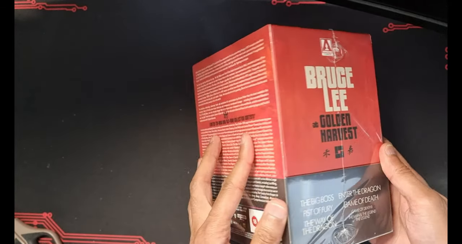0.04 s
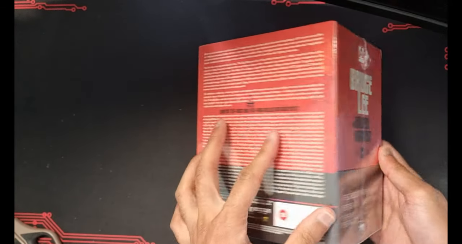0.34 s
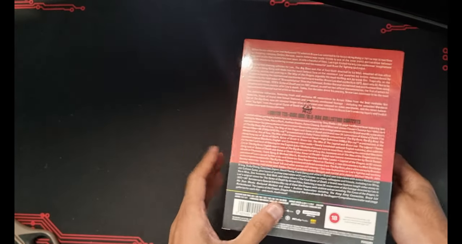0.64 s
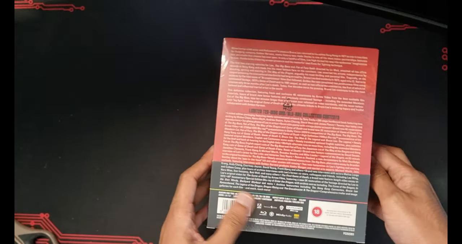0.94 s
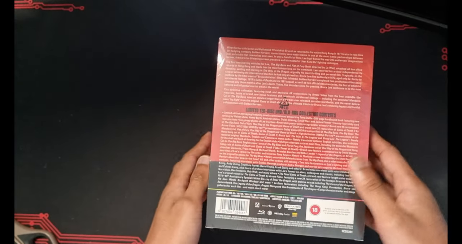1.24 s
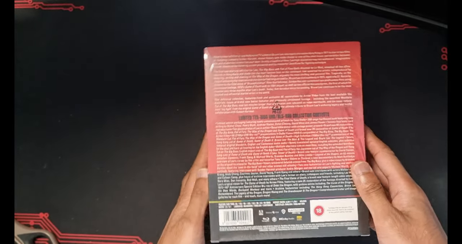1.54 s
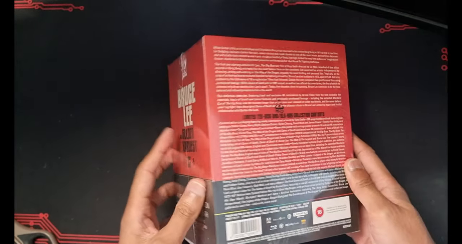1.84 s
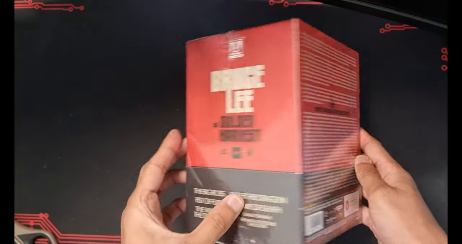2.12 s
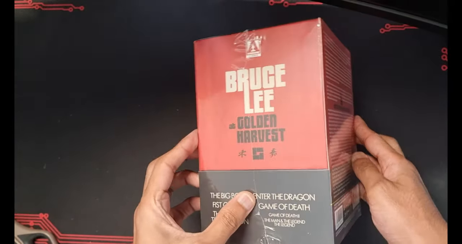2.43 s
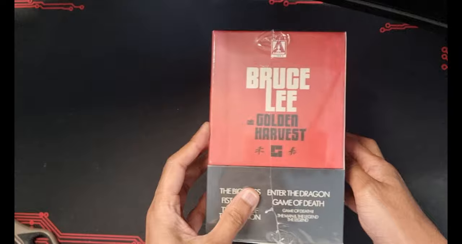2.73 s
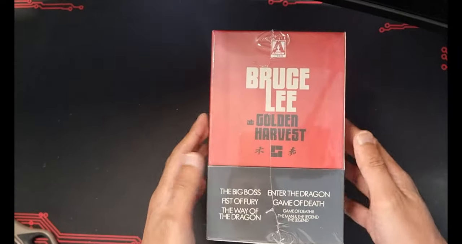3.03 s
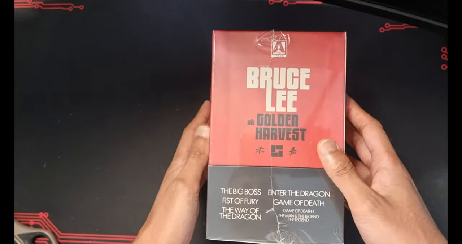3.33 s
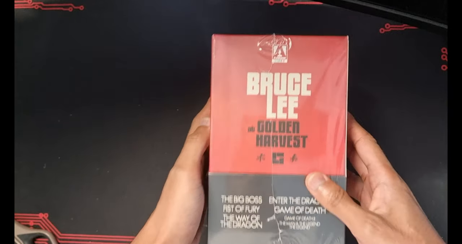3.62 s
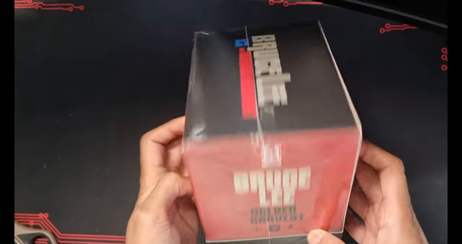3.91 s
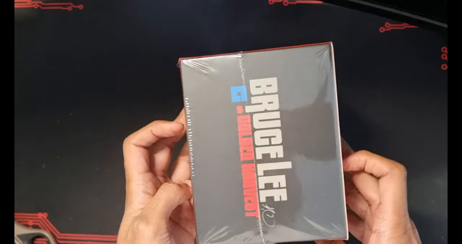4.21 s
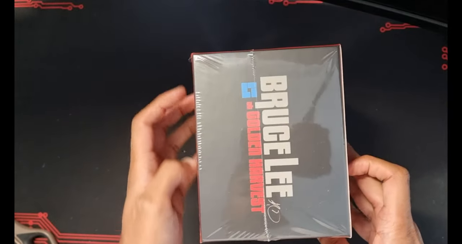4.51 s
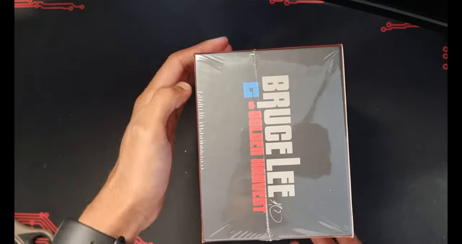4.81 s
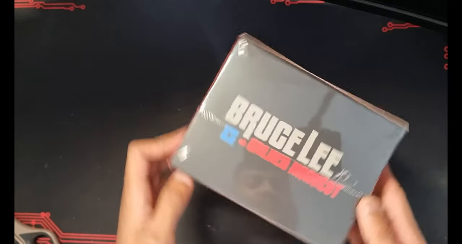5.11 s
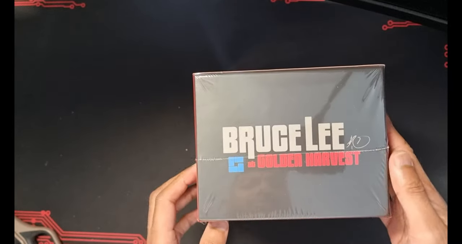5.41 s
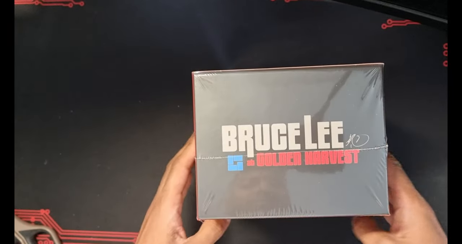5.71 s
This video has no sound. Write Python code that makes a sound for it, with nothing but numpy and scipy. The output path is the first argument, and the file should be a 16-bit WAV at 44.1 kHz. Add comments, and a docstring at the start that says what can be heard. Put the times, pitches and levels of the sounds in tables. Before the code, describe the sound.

Three hollow thumps of a cardboard box on a desk, while hands slide over its shrink wrap, making it hiss and snap.

```python
"""At a desk in a small room, a heavy shrink-wrapped boxed set is turned and set down three times, close by.
Each impact excites the damped normal modes of the desk and the cardboard; fingers tap the box too.
The taut film buckles with sharp snaps, and sliding friction makes it hiss, crinkle and rasp.
Early reflections and a short reverberant tail follow, over a soft fan-like murmur."""
import sys
import numpy as np
from scipy import signal
from scipy.fft import rfft, irfft, next_fast_len
from scipy.io import wavfile
from scipy.ndimage import uniform_filter1d, map_coordinates

SR = 44100
rng = np.random.default_rng(int(sys.argv[2]) if len(sys.argv) > 2 else 0)


def wav_record(signal):
    """Record a signal, one row per channel, as 16-bit PCM in the file named by sys.argv[1]."""
    frames = np.transpose(np.atleast_2d(signal))
    bounded = np.clip(frames, -1, 1)
    # unit amplitude maps onto the largest positive 16-bit level
    quanta = np.round(bounded * 32767).astype(np.int16)
    wavfile.write(sys.argv[1], SR, quanta)


N = 253575


def amp(db):
    """Amplitude ratio of a level in decibels."""
    return 10 ** (np.asarray(db) / 20)


def unit(x):
    """Normalisation to an rms of 1."""
    return x / np.sqrt(np.mean(x ** 2) + 1e-20)


def along(points, hz):
    """Interpolation of (frequency, value) points on a logarithmic frequency axis."""
    freqs, values = np.transpose(points)
    return np.interp(np.log(hz + 1), np.log(freqs + 1), values)


def wobble(rate, size=N):
    """Smooth random modulation: a spline through rate Gaussian knots a second."""
    knots = rng.standard_normal(int(size * rate / SR) + 4)
    return map_coordinates(knots, [np.arange(size) * rate / SR])


def noise(size, shared):
    """Partial coherence: two white noises with a shared fraction of their power."""
    z = rng.standard_normal((3, size))
    return np.sqrt(shared) * z[2] + np.sqrt(1 - shared) * z[:2]


def filtered(x, response):
    """Zero-phase filtering: the spectrum is multiplied by a frequency response."""
    size = next_fast_len(N + SR // 2)
    return irfft(rfft(x, size) * response(np.fft.rfftfreq(size, 1 / SR)), size)[..., :N]


def coloured(x, spectrum):
    """Spectral shaping by (frequency [Hz], level [dB]) points, at an rms of 1."""
    return unit(filtered(x, lambda hz: amp(along(spectrum, hz))))


def band(x, lo_hz, hi_hz, order=2):
    """Causal band-pass filtering."""
    sos = signal.butter(order, [lo_hz, min(hi_hz, SR / 2 - 1)], 'band', fs=SR, output='sos')
    return signal.sosfilt(sos, x)


def resonance(x, hz, q):
    """A second-order resonator of bandwidth hz / q."""
    return band(x, hz * (1 - .5 / q), hz * (1 + .5 / q), order=1)


def add(track, start_s, sound):
    """Superposition of a delayed sound on the track."""
    part = track[:, round(start_s * SR):][:, :sound.shape[-1]]
    part += sound[..., :part.shape[1]]


def early_echoes(x, echo_db, count=8):
    """Early reflections: desk, screen and hands return weak copies within 12 ms, different on each side."""
    paths = np.zeros((2, round(.012 * SR)))
    for side in paths:
        side[rng.integers(SR // 1000, len(side), count)] = amp(echo_db) * rng.choice([-1, 1], count)
    paths[:, 0] = 1
    return signal.fftconvolve(x, paths / np.linalg.norm(paths[0]), axes=1)[:, :x.shape[1]]


# Reverberation time of the room: (frequency [Hz], T60 [s])
ROOM_T60 = [(60, 0.48), (150, 0.24), (400, 0.3), (1000, 0.47), (3000, 0.32), (7000, 0.084), (11000, 0.11),
            (16000, 0.045)]
def in_room(x, wet_db, build_s):
    """Reverberation: a diffuse field builds up behind the direct sound and decays exponentially."""
    hz, t, spectra = signal.stft(rng.standard_normal((2, SR // 2)), SR, nperseg=256)
    tail = signal.istft(spectra * amp(-60 * t / along(ROOM_T60, hz)[:, None]), SR, nperseg=256)[1]
    tail *= 1 - np.exp(-np.arange(tail.shape[1]) / SR / build_s)
    tail /= np.linalg.norm(tail[0])
    return x + amp(wet_db) * signal.fftconvolve(x, tail, axes=1)[:, :x.shape[1]]


# Envelope of the murmur: (time [s], relative level [dB])
MURMUR_LEVEL = [(0, -70.5), (3.4, -70), (4.55, -63), (5.75, -65.5)]
# Spectrum of its fan-like part: (frequency [Hz], relative spectral density [dB])
FAN_SPECTRUM = [(20, -7.5), (45, 5), (80, 4.5), (130, -11), (190, -2.5), (255, 7.5), (330, -6), (470, -5),
                (600, -19), (720, -1.5), (860, -1), (1100, -12), (1800, -23.5), (8000, -51.5)]
def murmur():
    """Amplitude-modulated noise: a fan-like murmur and a low rumble swell under one envelope."""
    level_db = np.interp(np.arange(N) / SR, *np.transpose(MURMUR_LEVEL))
    fan = amp(level_db + 4 + 0.72 * wobble(8)) * coloured(noise(N, shared=0.074), FAN_SPECTRUM)
    rumble = amp(level_db - 2.5 + 1.5 * wobble(21)) * unit(band(noise(N, shared=0.31), 30, 190))
    return (fan + rumble) * amp([[-.6], [.6]])


# Hand strokes on the film: (time of peak speed [s], rise [s], fall [s], drag level [dB], hiss level [dB])
HAND_STROKES = [(.35, 0.093, 0.15, -71.5, -72.5), (.52, 0.074, 0.1, -62.5, -65),
                (.68, 0.12, 0.086, -64.5, -60), (.84, 0.049, 0.072, -68.5, -73.5),
                (.975, 0.042, 0.066, -52, -61.5), (1.16, 0.23, 0.11, -77, -70.5),
                (1.58, 0.14, .1, -80, -80.5), (1.92, 0.23, 0.11, -71, -75.5),
                (2.24, 0.14, 0.099, -69.5, -65.5), (2.45, 0.11, 0.13, -66.5, -67.5),
                (2.81, 0.14, .16, -63, -65.5), (3.01, 0.02, .03, -64, -66), (3.069, 0.055, .08, -81, -78),
                (3.47, 0.048, 0.0334, -97, -80.5), (3.931, 0.11, 0.11, -57, -53),
                (4.09, 0.096, 0.056, -53, -59), (4.21, 0.08, .07, -55.5, -64.5),
                (4.32, 0.07, 0.064, -51, -82), (4.385, 0.037, 0.035, -61.5, -59.5),
                (4.45, .04, 0.056, -74, -72), (5.119, 0.11, 0.13, -72, -55.5), (5.31, 0.15, 0.1, -72, -55),
                (5.59, 0.029, .03, -72.5, -75)]
def friction_levels():
    """Incoherent summation: strokes add in power, their amplitude following speed. Drag and hiss in dB."""
    t = np.arange(N) / SR
    grip_drag_db, grip_hiss_db = -87, -83  # the hands never rest entirely
    flatness = 2.48  # 2 is a bell; higher holds the speed for longer
    power = np.zeros((2, N)) + amp([[grip_drag_db], [grip_hiss_db]]) ** 2
    for peak_s, rise_s, fall_s, drag_db, hiss_db in HAND_STROKES:
        speed = np.exp(-np.abs((t - peak_s) / np.where(t < peak_s, rise_s, fall_s)) ** flatness)
        power += (amp([[drag_db], [hiss_db]]) * speed) ** 2
    return 10 * np.log10(power)


def shifting(x, depth_db):
    """Time-varying filtering: the film's resonances come and go as the fingers move over it."""
    spectra = signal.stft(x, nperseg=512)[2]
    field = uniform_filter1d(rng.standard_normal(spectra.shape[1:]), size=4, axis=0)  # smooth in frequency
    field = uniform_filter1d(field, size=12, axis=1)  # and in time
    return signal.istft(spectra * unit(amp(depth_db * unit(field))), nperseg=512)[1][:, :N]


# Spectra of the coarse drag and the fine hiss: (frequency [Hz], relative spectral density [dB])
DRAG_SPECTRUM = [(200, -3), (400, 6), (700, -1), (1400, -1), (2000, -5.5), (2900, -2), (4200, -8),
                 (7000, -24), (15000, -43.5)]
HISS_SPECTRUM = [(1470, -40.5), (2500, -17.5), (2680, -14.5), (3350, -11.5), (3880, -6.5), (6360, 0.5),
                 (7360, 0.5), (8590, -7.5), (12000, -6.5), (15200, -4.5), (15800, -9)]
def sliding():
    """Friction noise: film hisses over skin and desk, with coarser catches where it drags."""
    drag_db, hiss_db = friction_levels()
    catches = noise(N, shared=0.13) * amp(2.7 * wobble(700))
    drag = amp(drag_db + 0.5 + 1.8 * wobble(55)) * coloured(catches, DRAG_SPECTRUM)
    grain = noise(N, shared=.02) * amp(1.5 * wobble(1200))
    hiss = amp(hiss_db + 1 + .5 * wobble(44)) * coloured(grain, HISS_SPECTRUM)
    swish = filtered(hiss, lambda hz: hz < 5200)
    sizzle = filtered(hiss, lambda hz: hz > 8200)
    hiss += swish * (amp(1.3 * wobble(23)) - 1)  # the colour shifts as the grip changes
    hiss += sizzle * (amp(0.18 * (hiss_db + 61.5)) - 1)  # faster sliding is brighter
    rubbing = shifting(drag, depth_db=3.5) + shifting(hiss, depth_db=1.5)
    return early_echoes(rubbing, echo_db=-13.5) * amp([[-.9], [.9]])


# Resonances of the wrinkles in the film: (frequency [Hz])
WRINKLE_PITCHES = [1450, 2400, 3200, 6100]
def crinkles():
    """Shot noise: random impulses ring each wrinkle, their strength in proportion to the drag."""
    ticks_per_s, scatter_db = 10, 4.5
    drag_db, _ = friction_levels()
    out = np.zeros(N)
    for hz in WRINKLE_PITCHES:
        ticks = (rng.random(N) < ticks_per_s / SR) * amp(scatter_db * rng.standard_normal(N))
        out += resonance(ticks * amp(drag_db + 19), hz, q=3)
    return in_room(early_echoes(out[None], echo_db=-8), wet_db=-9.5, build_s=.003)


# Partials of a film-covered panel: (frequency ratio [1], relative level [dB])
PANEL_PARTIALS = [(1, 7.5), (1.7, -20.5), (2.15, -15.5)]
# Snaps of the taut film: (time [s], crack level [dB], panel frequency [Hz], panel level [dB])
FILM_SNAPS = [(0.12, -52, 3100, -67), (0.219, -63, 6340, -50), (0.282, -59, 6050, -52.5),
              (0.608, -47, 1510, -34), (.961, -54, 1350, -33.5), (.977, -44, 480, -18),
              (.983, -52, 1300, -32), (1.063, -41.5, 3300, -46), (1.096, -53, 2250, -41),
              (1.357, -57, 5970, -54.5), (1.478, -58.5, 3200, -52), (2.131, -65, 3120, -53.5),
              (2.398, -64, 2980, -48.5), (2.783, -74, 1230, -29.5), (2.809, -52, 1360, -31),
              (2.8342, -19, 1050, -16), (2.843, -41, 2670, -24.5), (2.863, -26, 2530, -35.5),
              (2.920, -42, 2240, -36), (3.615, -44, 3340, -39), (3.708, -54.5, 6000, -72),
              (4.222, -43, 890, -24.5), (4.232, -41, 2320, -39), (4.260, -48, 2940, -32.5),
              (4.637, -47, 3270, -59), (4.666, -32.5, 3270, -38.5), (4.963, -76, 1024, -41)]
def snaps():
    """Buckling: the film strains for an instant, gives way with a crack and rings the panel under it."""
    out, lead_s = np.zeros((2, N)), .03
    t = np.arange(SR // 2) / SR - lead_s
    after, before = np.maximum(t, 0), np.maximum(-t, 0)
    pulse = amp(-60 * after / 0.0069 - 60 * before / 0.00059)
    flutter = amp(-14.5 - 60 * after / 0.057 - 60 * before / 0.03)
    for time_s, crack_db, panel_hz, panel_db in FILM_SNAPS:
        treble_db = -13 + .4 * (crack_db + 46)  # harder snaps are brighter
        burst = noise(len(t), shared=0.33) * (pulse + flutter)
        crack = band(burst, 1100, 6600, order=3) + amp(-2.5) * band(burst, 900, 1600)
        crack += amp(treble_db) * band(burst, 11000, 18000)
        panel = sum(amp(db) * resonance(burst, panel_hz * ratio, q=3) for ratio, db in PANEL_PARTIALS)
        panel *= np.linalg.norm(pulse) / np.linalg.norm(panel)
        snap = in_room(amp(crack_db) * crack, wet_db=-4.5, build_s=0.0026) + amp(panel_db) * panel
        add(out, time_s - lead_s, early_echoes(snap, echo_db=-13.5))
    return out * amp([[-1.9], [1.4]])


def ring(modes, t, cutoff_hz, damping, rise_cycles, scatter_db, spread_hz):
    """Modal superposition: damped sinusoids, the higher ones further out of phase between the sides."""
    hz, db, t60 = np.transpose(modes)[:, :, None]
    strength, lead = rng.standard_normal((2, len(modes), 1))
    phase = np.sign(lead) * np.arctan(hz / spread_hz)
    attack = 1 - np.exp(-t * hz / rise_cycles)
    decay = amp(db + scatter_db * strength - 60 * t * damping / t60)
    envelope = attack * decay / np.sqrt(1 + (hz / cutoff_hz) ** 4)
    return np.array([np.sum(envelope * np.sin(2 * np.pi * hz * t + side * phase), 0) for side in (-1, 1)])


# Normal modes of the desk and of the filled cardboard box: (frequency [Hz], relative level [dB], T60 [s])
DESK_MODES = [(41.2, -4.5, 0.28), (68.3, -12.5, 0.28), (76, 2, 0.22), (145.5, 4, .16), (154, -9, 0.26)]
BOX_MODES = [(234, -10.5, 0.077), (258.4, -2.5, 0.14), (299.1, -6.5, 0.093), (348.3, -8, 0.17),
             (393, -20.5, 0.34), (488, -12.5, 0.12), (534, -22.5, 0.064), (656, -15, 0.095),
             (816, -12.5, 0.12), (838, -19, 0.16), (1018, -32, 0.033), (1130, -31.5, 0.058)]
# Taps and landings; harder contacts raise the cutoff, gripping hands raise the damping:
# (time [s], desk level [dB], box level [dB], cutoff [Hz], damping factor [1])
IMPACTS = [(0.34, -69, -50.5, 400, 2.4), (0.833, -50.5, -46, 330, 1.7), (.962, -67, -29.5, 650, 1.6),
           (.977, -65, -20, 654, 1.84), (0.987, -24, -20, 430, 1.37), (1.411, -54.5, -51.5, 800, 2.1),
           (2.094, -61, -49, 330, 1.04), (2.277, -56, -33.5, 229, 1.3), (2.837, -38.5, -22, 1204, 2.2),
           (2.840, -9.5, -10.5, 672, 1.16), (3.627, -52.5, -38.5, 351, 1), (4.042, -43.5, -41, 905, 2.9),
           (4.165, -58, -39, 504, 0.54), (4.205, -45, -29, 500, 1.1), (4.223, -21.5, -28, 900, 1.04),
           (4.226, -11.5, -13, 634, 1.96), (4.275, -36.5, -37, 350, 0.76), (4.312, -43, -34.5, 600, 0.88),
           (4.366, -45, -41, 600, 1.7), (4.67, -63, -40.5, 500, 1.9), (4.963, -65, -31, 326, 1.6),
           (5.162, -54, -46, 400, 2.3)]
def knocks():
    """Impact excitation: each blow rings box and desk, jostles the cases inside and leaves a shudder."""
    out = np.zeros((2, N))
    t, long_t = np.arange(SR // 2) / SR, np.arange(3 * SR // 2) / SR
    cases_t60_s, shudder_t60_s = 0.41, 2.27
    for time_s, desk_db, box_db, cutoff_hz, damping in IMPACTS:
        desk = ring(DESK_MODES, t, cutoff_hz, damping, rise_cycles=.4, scatter_db=-0.32, spread_hz=450)
        box = ring(BOX_MODES, t, cutoff_hz, damping, rise_cycles=.35, scatter_db=1, spread_hz=620)
        cases = unit(band(noise(len(t), shared=0.062), 350, 1500))
        add(out, time_s, in_room(amp(desk_db) * desk, wet_db=-20.5, build_s=0.025))
        add(out, time_s, in_room(amp(box_db) * box, wet_db=-11.5, build_s=0.0068))
        add(out, time_s, amp(1.14 * box_db - 31 - 60 * t / cases_t60_s) * cases)
        shudder = unit(band(noise(len(long_t), shared=.6), 17, 87, order=3))
        shudder *= 1 - np.exp(-long_t / 0.023)
        add(out, time_s, amp(desk_db - 34.5 - 60 * long_t / shudder_t60_s) * shudder)
    return band(out, 24, 12000, order=3) * amp([[-.4], [.4]])


# Short rasps of fingertips and box edges, and the hollow clack of the third landing:
# (centre time [s], duration [s], level [dB], frequency [Hz])
RASPS_AND_CLACK = [(.48, 0.26, -64.5, 336), (0.671, 0.023, -58, 725), (0.757, 0.012, -54, 466),
                   (0.762, 0.019, -61, 1450), (2.744, 0.073, -59, 338), (2.773, 0.16, -65.5, 1210),
                   (3.868, 0.085, -54, 4330), (3.918, 0.036, -55.5, 1540), (4.079, 0.052, -52, 13500),
                   (4.091, 0.04, -54, 1310), (4.226, 0.0085, -28.5, 804), (4.33, 0.033, -53, 790),
                   (4.537, 0.048, -71, 1740)]
def rasps_and_clack():
    """Noise-driven resonance: uneven bursts are heard as rasps, the shortest and loudest as a clack."""
    out, t = np.zeros((2, N)), np.arange(SR // 2) / SR
    for centre_s, duration_s, db, hz in RASPS_AND_CLACK:
        rough = noise(len(t), shared=.2) * amp(4 * wobble(600, size=len(t)))
        response = unit(resonance(resonance(rough, hz, q=1.8), hz, q=1.8))
        envelope = np.exp(-2 * ((t - t.mean()) / duration_s) ** 2)
        add(out, centre_s - t.mean(), amp(db) * envelope * response)
    return in_room(out, wet_db=-13, build_s=.006)


def scene():
    """Linear superposition: the sounds of box, film and room add."""
    return knocks() + snaps() + rasps_and_clack() + sliding() + crinkles() + murmur()


def record(dry):
    """Band limiting: a steep low-pass removes the highest treble."""
    cutoff_hz = 15850
    return filtered(dry, lambda hz: 1 / (1 + (hz / cutoff_hz) ** 120))


dry = scene()
out = record(dry)
wav_record(out)
```